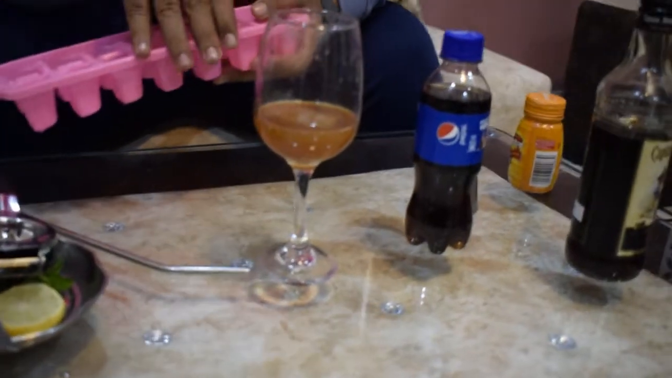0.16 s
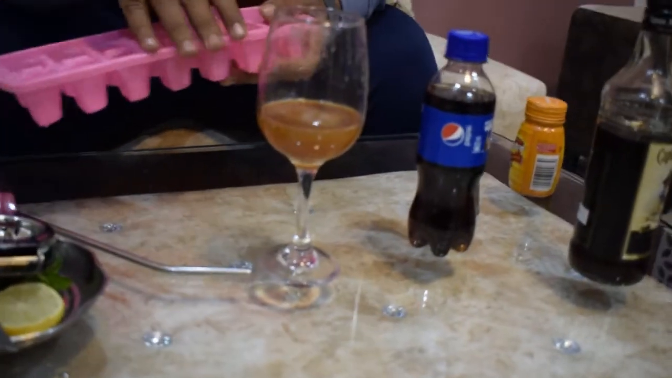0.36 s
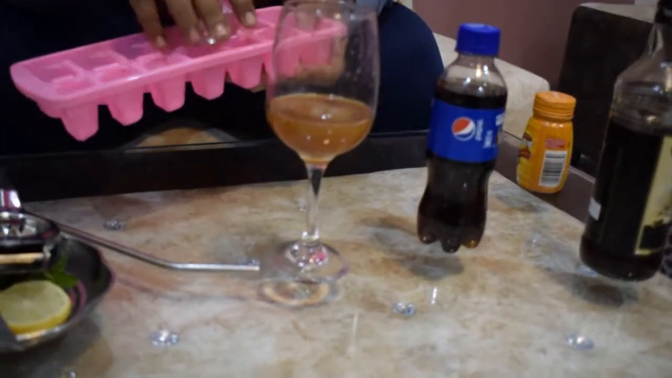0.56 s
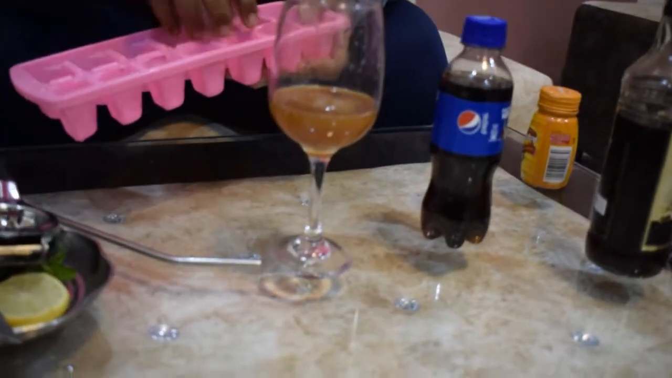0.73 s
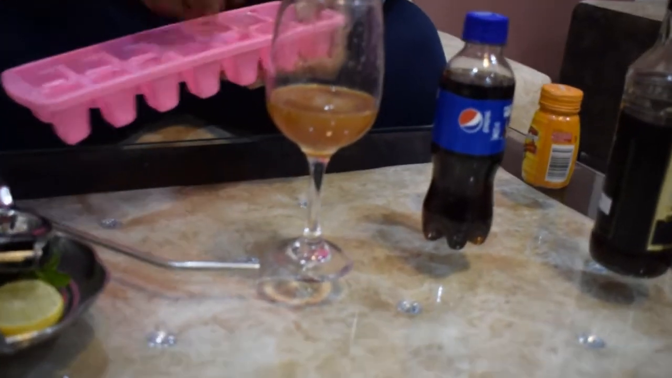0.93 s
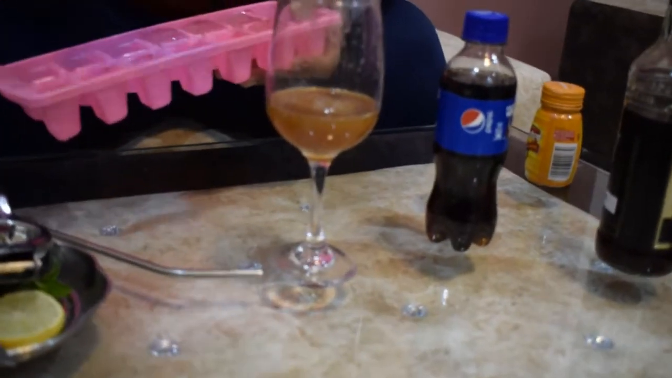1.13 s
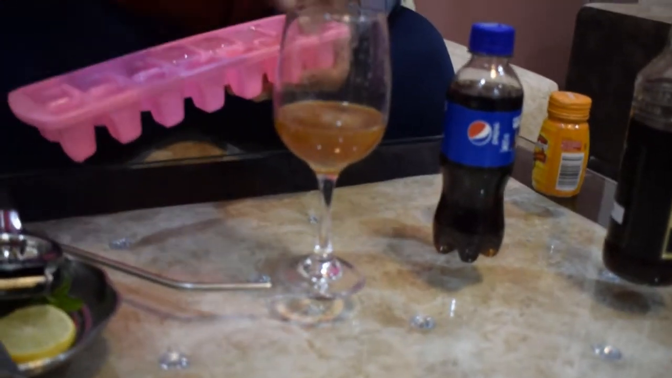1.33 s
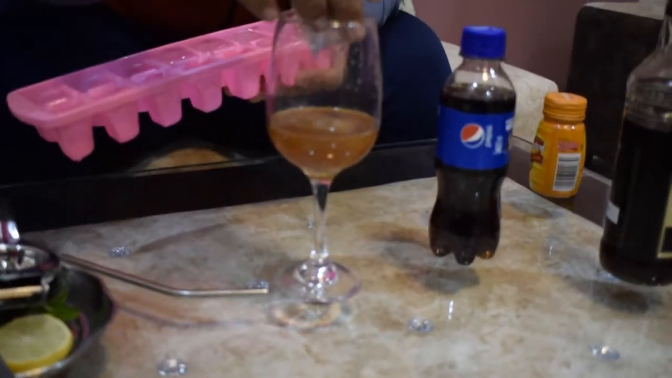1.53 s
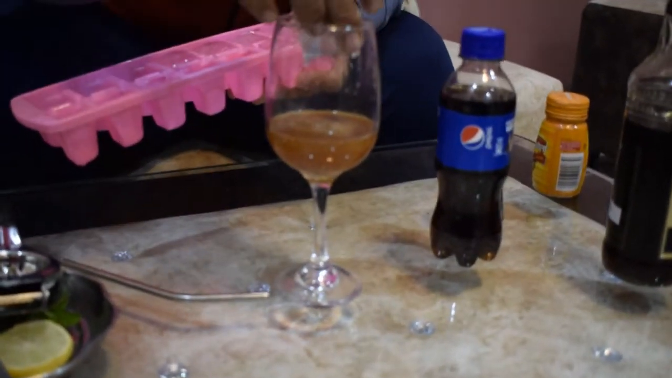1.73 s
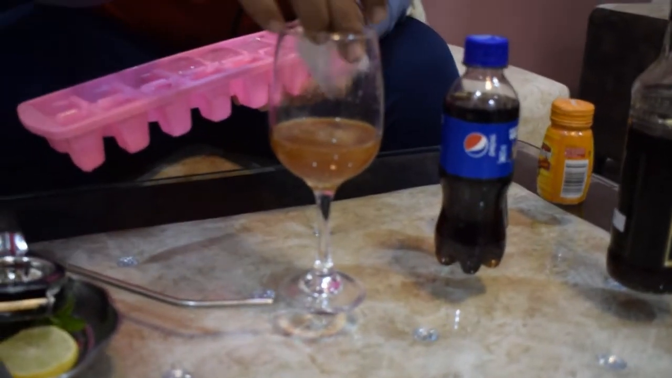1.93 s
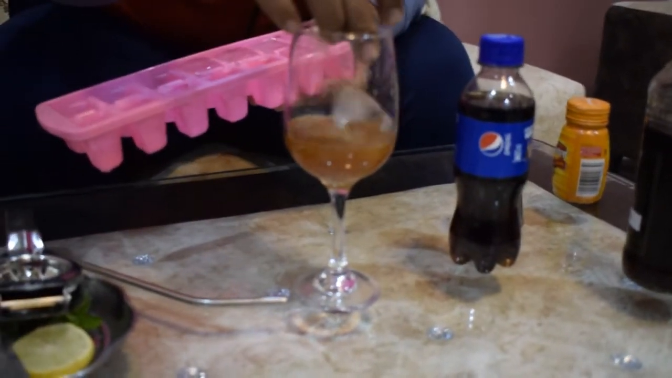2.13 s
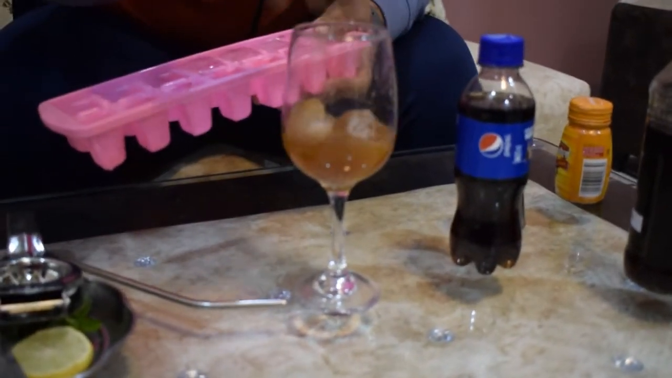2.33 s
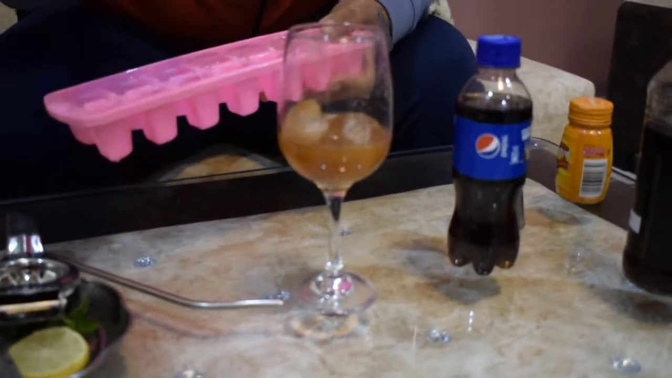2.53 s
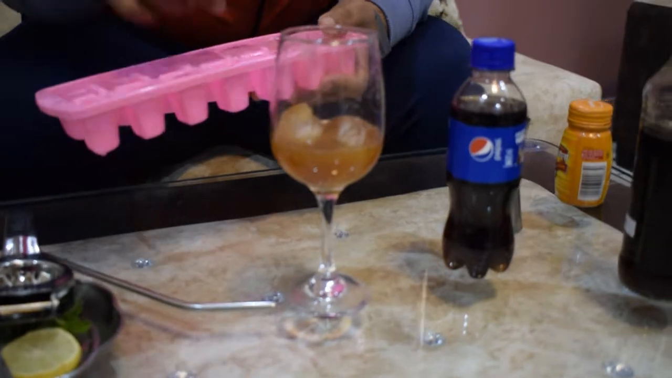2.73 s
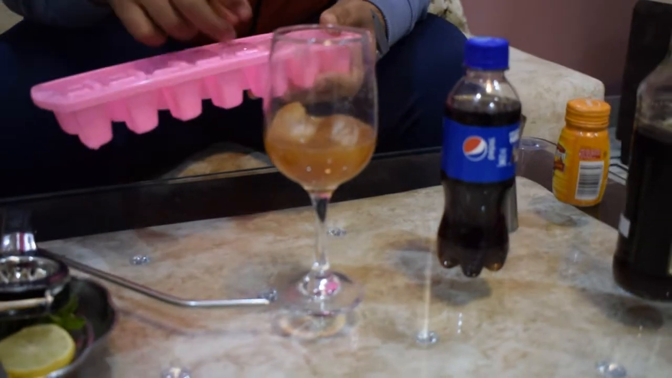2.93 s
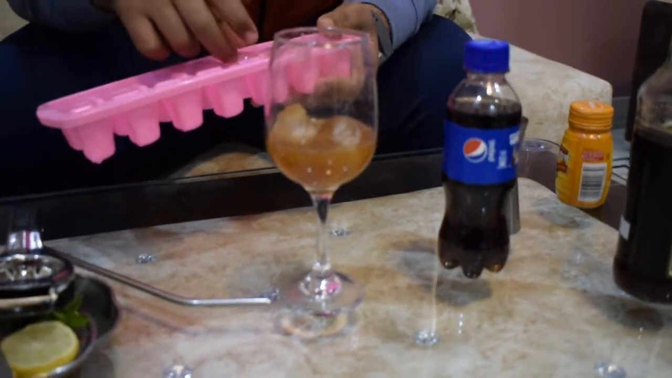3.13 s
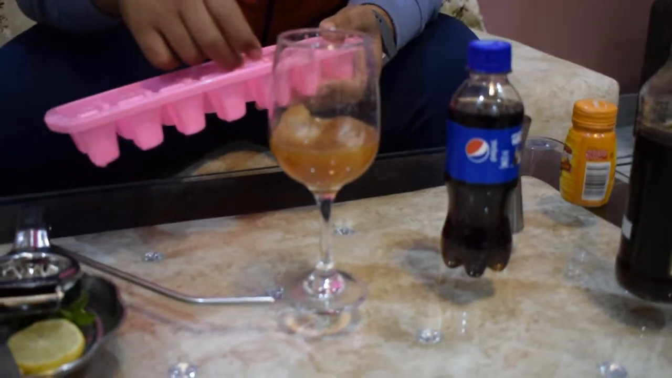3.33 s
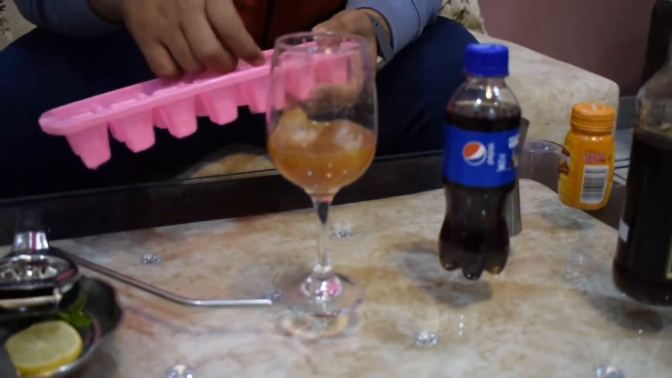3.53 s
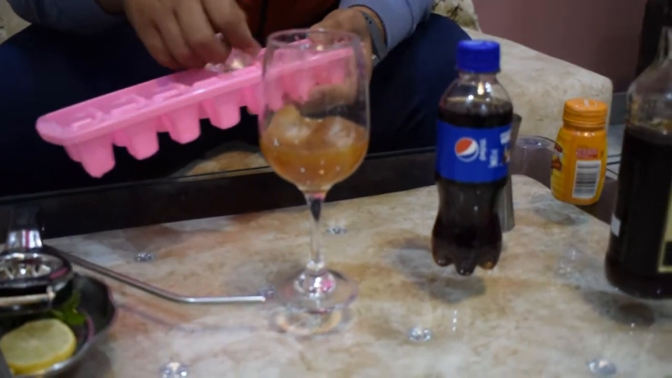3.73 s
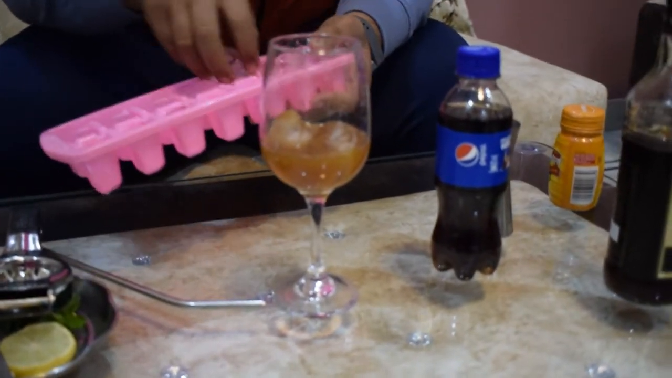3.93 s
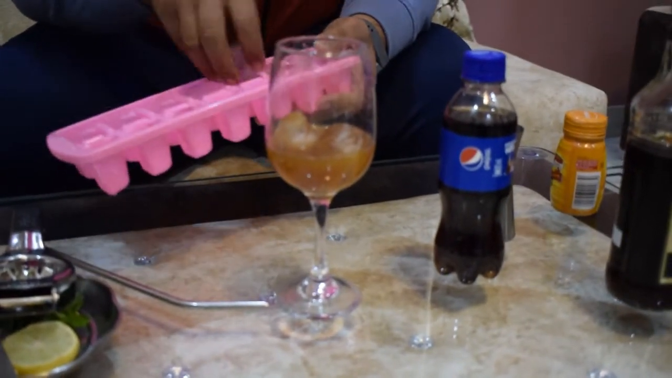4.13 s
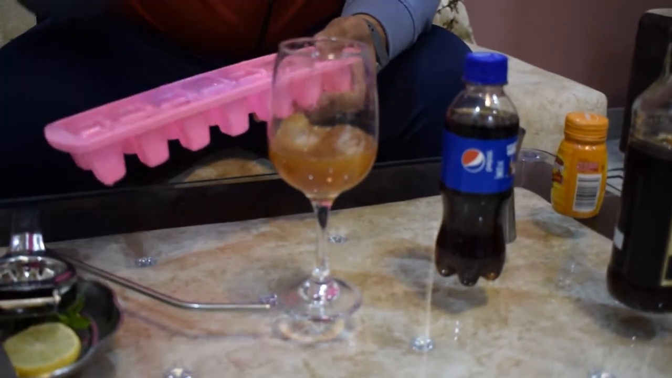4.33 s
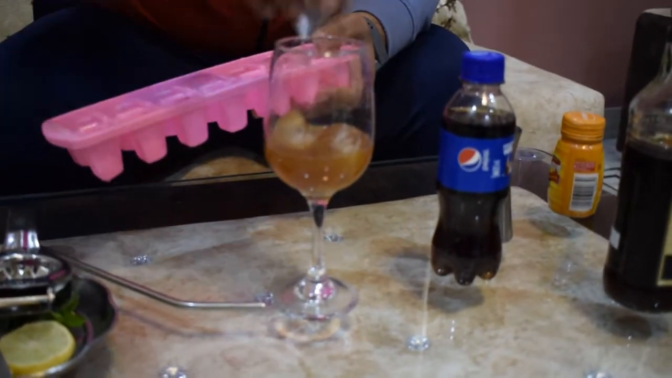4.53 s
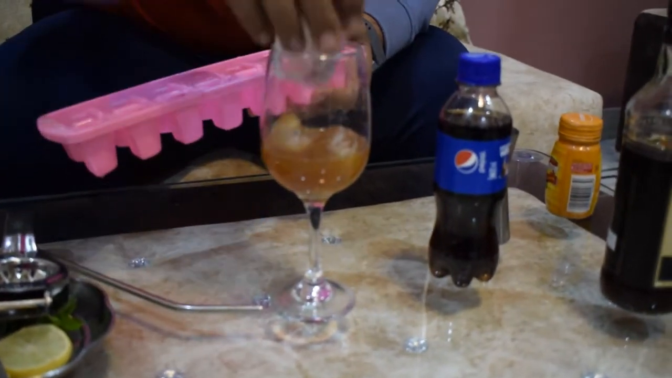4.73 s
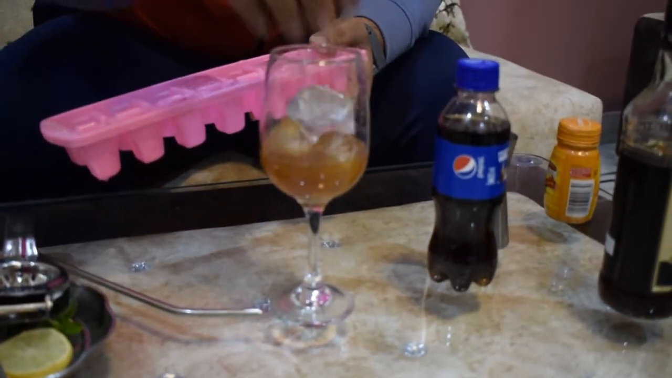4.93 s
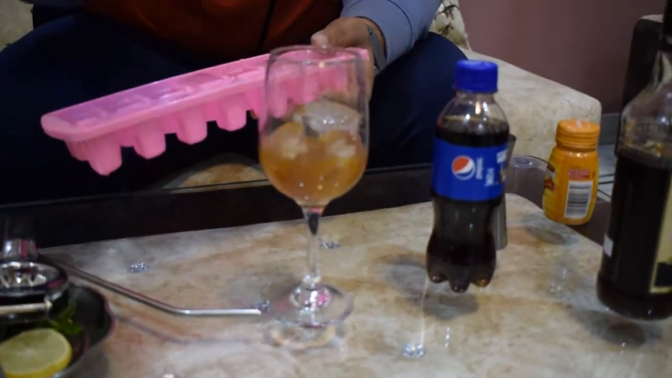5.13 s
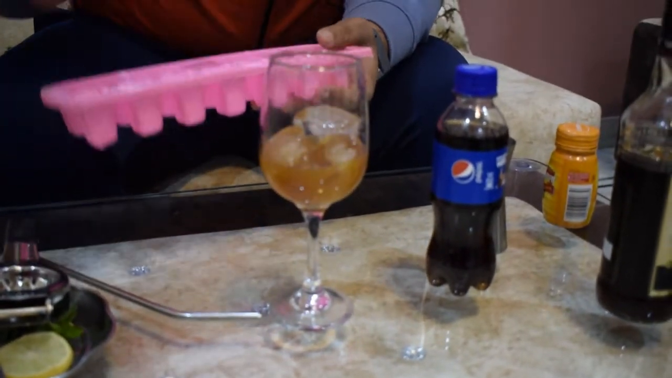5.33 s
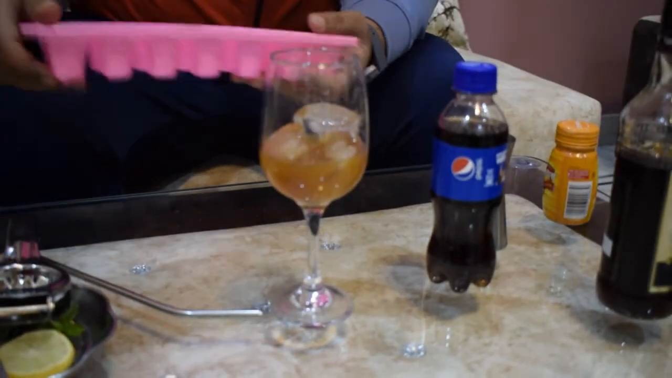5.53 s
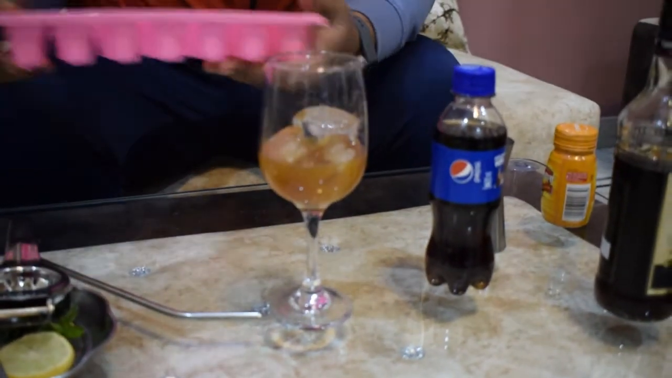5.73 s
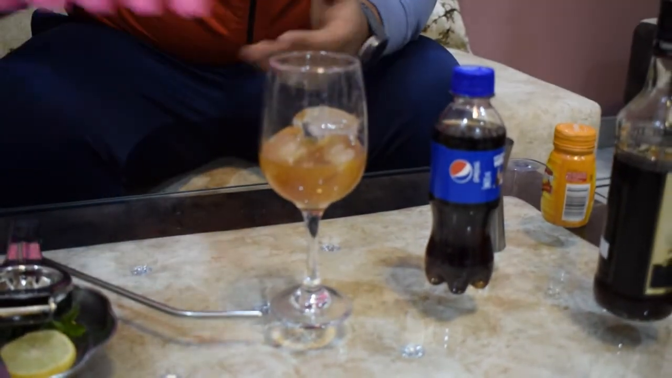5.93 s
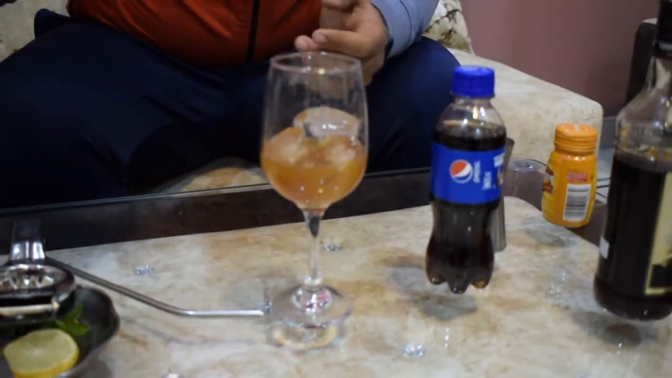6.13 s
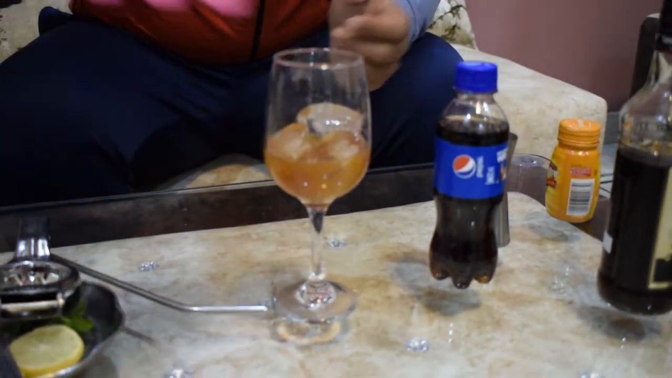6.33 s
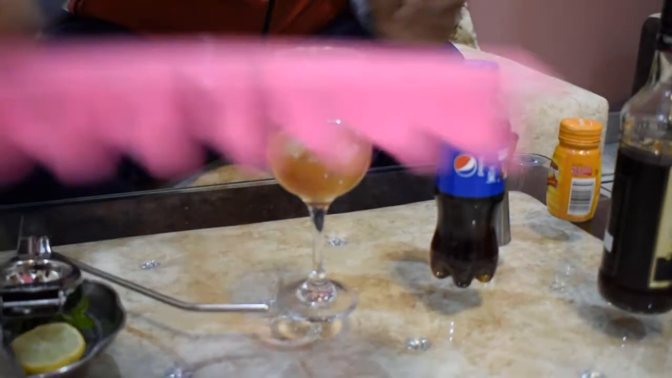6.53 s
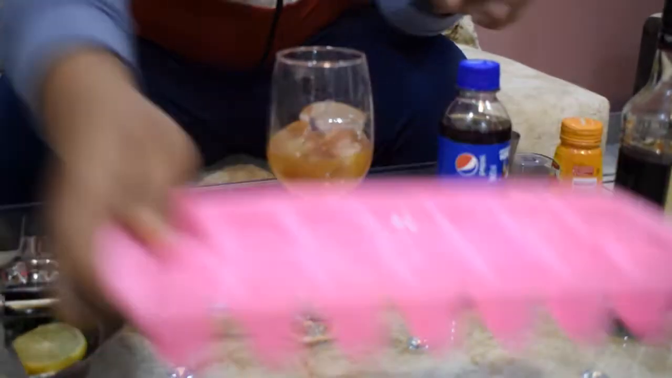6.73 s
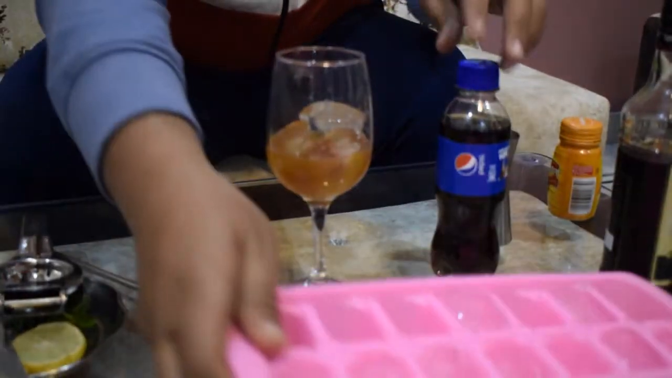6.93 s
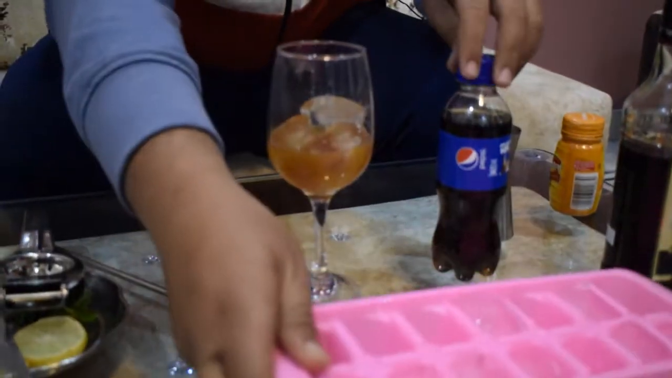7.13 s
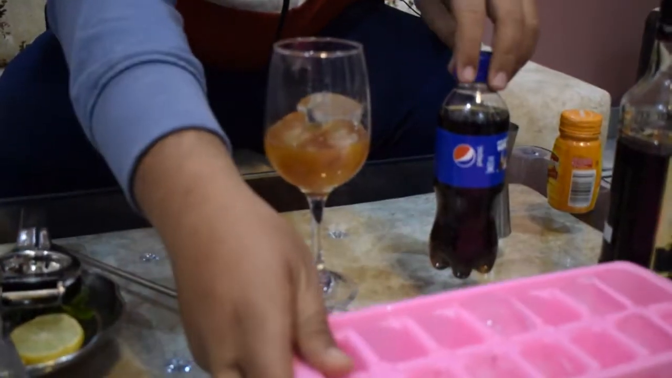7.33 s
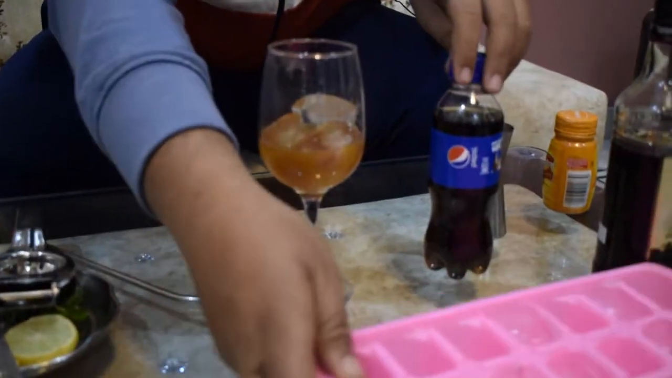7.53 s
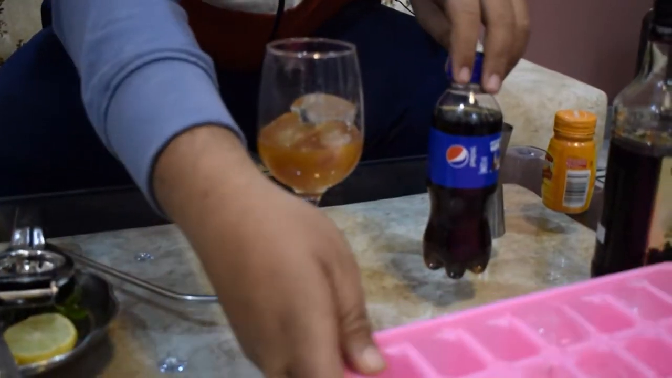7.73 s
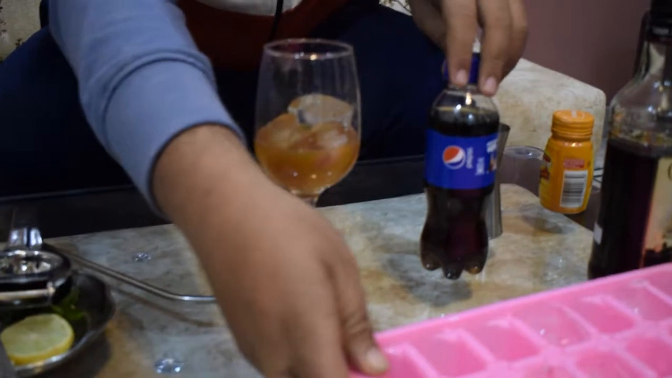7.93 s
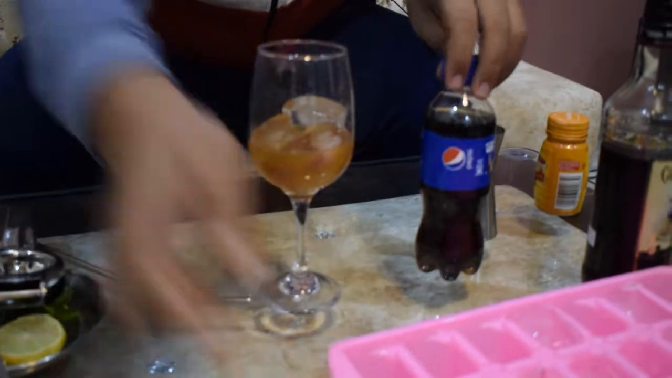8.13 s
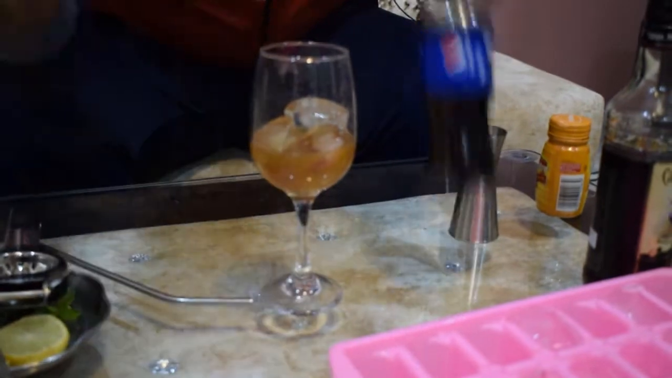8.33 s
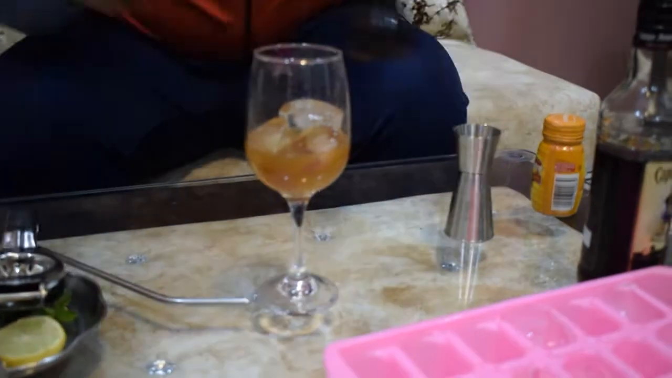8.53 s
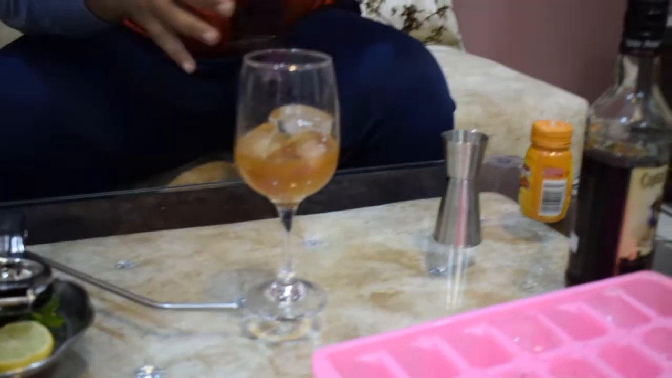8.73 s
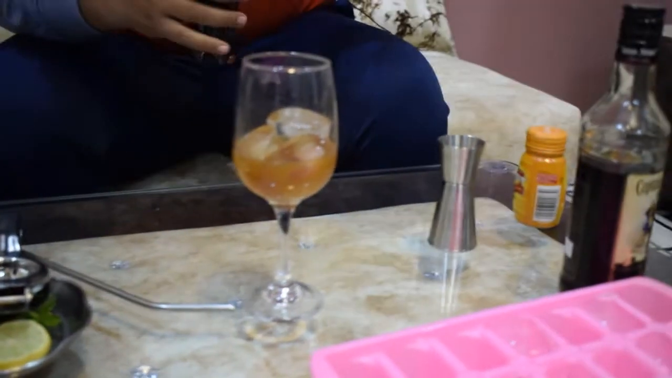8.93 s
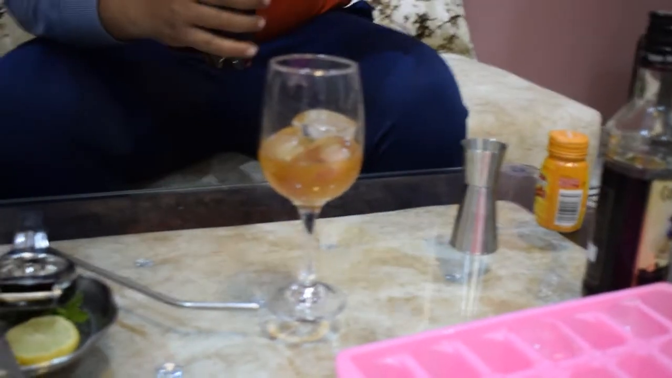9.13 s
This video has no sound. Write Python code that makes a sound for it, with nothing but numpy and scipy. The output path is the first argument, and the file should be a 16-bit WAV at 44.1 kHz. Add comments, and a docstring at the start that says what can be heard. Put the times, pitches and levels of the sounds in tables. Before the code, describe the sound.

Hollow plastic snaps and scrapes, ice striking a stemmed glass and plunging into drink twice, then soft tray knocks on a table.

```python
"""In a small hard-walled room, ice is prised from a plastic tray and dropped into a stemmed glass with a little drink.
Stick-slip noise rings the hollow cells; each landing drives the resonances of the standing glass, the modes of
its bowl and a burst of bubbles. The tray is then set down with a few knocks that excite table and cells.
Sleeves rustle, small rubs pass, and a motor whirs faintly over steady air noise; all is in mono, from close by."""
import sys
import numpy as np
from scipy import signal
from scipy.fft import rfft, irfft
from scipy.io import wavfile

SR = 44100
rng = np.random.default_rng(int(sys.argv[2]) if len(sys.argv) > 2 else 0)


def pcm_store(signal):
    """Save signal as 16-bit PCM."""
    levels = np.round(np.clip(np.atleast_2d(signal), -1, 1) * 32767)
    wavfile.write(sys.argv[1], SR, levels.astype(np.int16).T)


N = 404384


def from_db(db):
    """Level law: decibels to amplitude gain."""
    return 10 ** (np.asarray(db) / 20)


def unit_energy(x):
    """Energy normalisation: the squares sum to one."""
    return x / np.sqrt(np.sum(x ** 2) + 1e-20)


def at_hz(points, hz):
    """Interpolation on a logarithmic frequency axis."""
    knots, values = np.transpose(points)
    return np.interp(np.log(np.maximum(hz, 1)), np.log(knots), values)


def add(track, start_s, sound):
    """Superposition: a sound is summed into a track from its start time."""
    start = max(round(start_s * SR), 0)
    track[start:start + len(sound)] += sound[:N - start]


def cut(x, hz, kind, order=2):
    """Butterworth filtering: a maximally flat pass band."""
    sections = signal.butter(order, hz, kind, fs=SR, output="sos")
    return signal.sosfilt(sections, x + 1e-18)


def resonate(x, modes):
    """Modal superposition: parallel damped resonators (pitch_hz, width_hz, peak level_db)."""
    out = 0
    for hz, width, db in modes:
        radius = np.exp(-np.pi * width / SR)
        poles = [1, -2 * radius * np.cos(2 * np.pi * hz / SR), radius * radius]
        mode = (1 - radius * radius) / 2 * signal.lfilter([1, 0, -1], poles, x + 1e-18)
        out = out + from_db(db) * mode
    return out


def noise(spectrum):
    """Spectral shaping: steady random noise of a given colour, with rms 1."""
    colour = from_db(at_hz(spectrum, np.fft.rfftfreq(N, 1 / SR)))
    shaped = irfft(rfft(rng.standard_normal(N)) * colour, N)
    return unit_energy(shaped) * np.sqrt(N)


def contact(crush_s, crush_share, click=1, size=2048):
    """Contact force: an impulse plus a crunch that swells and dies as the surfaces settle."""
    age = np.arange(size) / SR / crush_s
    crunch = rng.standard_normal(size) * np.sqrt(age) * np.exp(-age)
    force = crush_share * unit_energy(crunch)
    force[0] += click
    return unit_energy(force)


def stick_slip(length_s, per_s, spread_db, snap_s=0.0024, size=6000):
    """Stick-slip friction: a swell of uneven tiny slips, which tends to one snap when very short."""
    phase = np.minimum(np.arange(size) / SR / length_s, 1)
    slipping = rng.random(size) < per_s / SR
    strength = rng.choice([-1, 1], size) * from_db(spread_db * rng.standard_normal(size))
    swell = np.sqrt(phase * (1 - phase))
    snap = np.exp(-(length_s / snap_s) ** 2 / 2)
    force = (1 - snap) * unit_energy(slipping * strength * swell)
    force[0] += snap
    return unit_energy(force)


def blows(rows, modes, thud_hz, crack_hz, crush_s, crush_share, chip_s, lowest_hz):
    """Forced vibration: the heavy, firm and sharp parts of each blow drive one resonant body."""
    thud, knock, crack = np.zeros((3, N))
    for start_s, thud_db, knock_db, crack_db, bright_hz, _ in rows:
        # soft or wet contacts have a lower brightness
        chips = cut(contact(chip_s, 0.71, click=0.66), min(bright_hz, SR / 2.2), "low", order=3)
        add(thud, start_s, from_db([thud_db]))  # a single-sample impulse
        add(knock, start_s, from_db(knock_db) * contact(crush_s, crush_share))
        add(crack, start_s, from_db(crack_db) * chips)
    heavy = cut(thud, thud_hz, "low")
    firm = cut(knock, [thud_hz, crack_hz], "band")
    sharp = cut(crack, crack_hz, "high")
    return cut(resonate(firm - heavy + sharp, modes), lowest_hz, "high")


# a cube breaks free of its cell: start_s, length_s, ring_db (hollow cell), pitch_hz (cell), crackle_db
CELL_SNAPS = [(.063, 0.0051, -3.5, 725, -11.5), (.173, 0.0056, 0.5, 1150, -7.5),
              (.271, 0.0052, 6, 990, -15), (.304, 0.0067, 16.5, 1320, 3), (0.32, 0.0042, 10.5, 990, -10),
              (0.394, 0.0037, 8.5, 1050, -4), (0.5956, 0.0023, 22, 985, 1), (.742, 0.0033, 16.5, 740, -4.5),
              (3.258, 0.0015, -2, 895, -19.5), (3.384, 0.0048, -7.5, 810, -21),
              (3.474, 0.0055, -3, 1100, -2), (3.519, 0.0059, 12.5, 1005, 1),
              (3.8233, 0.0025, 23.5, 1340, -2), (3.841, 0.0054, 11, 695, -29),
              (3.874, 0.0038, 12, 619, -27), (3.979, 0.0065, 12, 1170, -9.5),
              (4.047, 0.0058, 4.5, 1228, -18), (4.097, 0.0038, -0.5, 1230, -17),
              (4.173, 0.0097, 13.5, 1370, -3.5), (5.739, 0.0047, -7, 930, -9)]
# a cube drags along the cell wall: start_s, length_s, ring_db (hollow cell), pitch_hz (cell at first), crackle_db
CELL_SCRAPES = [(.281, .1, 8, 960, -10), (.556, 0.01, 16.5, 1160, 7), (.597, .035, 5.5, 1100, -24),
                (.723, 0.02, 8, 940, -13.5), (0.791, 0.043, 6.5, 685, -19), (.857, 0.015, -0.5, 900, -9),
                (3.46, 0.094, 1.5, 860, -8), (3.608, 0.064, 8, 1240, -4.5), (3.666, 0.096, 5, 1340, -7),
                (3.756, 0.025, 15.5, 1398, -3.5), (3.842, 0.085, 9.5, 1320, -5.5),
                (4.019, 0.02, 2.5, 1376, -11.5), (4.147, 0.022, 6.5, 1390, -9.5),
                (5.456, 0.018, -12.5, 1290, -17), (5.555, 0.04, 3, 1580, -17), (5.72, .009, -11, 1316, -15),
                (8.868, .024, -20, 1490, -16.5)]
CREEP_S, CREEP_DB = 0.012, -18.5  # just before a cube gives way; level relative to the snap
SETTLE_S, SETTLE_DB = 0.022, -19.5  # just after; level relative to the snap
JERK_S, JERK_OVERLAP, JERK_SPREAD_DB = 0.03, 0.6, 1.9  # approximate spacing, overlap in steps, unevenness
RISE_OCTAVES_PER_S = 1.1  # the cell pitch climbs from jerk to jerk


def slips():
    """Frictional instability: a snap creeps, gives and settles; a drag advances in overlapping jerks."""
    rows = []
    for s, snap_s, ring_db, hz, crackle_db in CELL_SNAPS:
        stages = [(s, snap_s, 0), (s - CREEP_S, CREEP_S, CREEP_DB), (s + snap_s, SETTLE_S, SETTLE_DB)]
        for start_s, length_s, db in stages:
            rows.append((start_s, length_s, ring_db + db, hz, crackle_db + db))
    for s, drag_s, ring_db, hz, crackle_db in CELL_SCRAPES:
        count = max(round(drag_s / JERK_S), 1)
        step_s = drag_s / (count + JERK_OVERLAP)
        jerk_s = step_s * (1 + JERK_OVERLAP)
        for k, db in enumerate(rng.normal(0, JERK_SPREAD_DB, size=count)):
            pitch_hz = hz * 2 ** (RISE_OCTAVES_PER_S * k * step_s)
            rows.append((s + k * step_s, jerk_s, ring_db + db, pitch_hz, crackle_db + db))
    return rows


# resonances of the plastic that ice makes crackle: pitch_hz, width_hz, level_db
PLASTIC_MODES = [(2090, 450, -1.5), (3580, 710, -2), (4180, 630, -2), (5300, 850, -17.5),
                 (6640, 1430, -2.5), (7540, 210, -3), (10960, 1000, -12), (12500, 1500, -8.5),
                 (14700, 510, -34)]


def ice_in_tray(cell_width_hz=220, wall_hz=760, wall_db=-13, lowest_hz=450, highest_hz=2100):
    """Cavity and wall resonance: slips ring the hollow cell, its pitch set by each slip, and crackle in the plastic."""
    hollow, crackle = np.zeros((2, N))
    for start_s, length_s, ring_db, cell_hz, crackle_db in slips():
        cell = [(cell_hz, cell_width_hz, 0), (wall_hz, 350, wall_db), (1550, 300, -18)]
        ring = resonate(stick_slip(length_s, per_s=1400, spread_db=4), cell)
        add(hollow, start_s, from_db(ring_db) * ring)
        grains = stick_slip(length_s, per_s=3200, spread_db=3.5, snap_s=0.0011)
        add(crackle, start_s, from_db(crackle_db) * grains)
    hollow = cut(cut(hollow, lowest_hz, "high"), highest_hz, "low", order=4)
    return hollow, cut(resonate(crackle, PLASTIC_MODES), 650, "high")


# thin ice splintering: start_s, level_db
SPLINTER_TICKS = [(0.049, -8), (.55, 0), (.563, 1), (.596, 0), (0.838, -12), (3.0161, -5.5), (3.068, -8),
                  (5.696, -8.5)]
# resonances of a splinter: pitch_hz, width_hz, level_db
SPLINTER_MODES = [(7200, 2300, -5.5), (13500, 2800, -2)]
FIDGET_FROM_S, FIDGET_TO_S, FIDGET_DB = 3.14, 3.44, -22.5  # fingers feel for the next cube


def splinters(length_s=0.0027, count=7):
    """Brittle fracture: tiny breaks give dry, glassy ticks; faint ones come at random under the fingers."""
    out = np.zeros(N)
    faint = [(s, FIDGET_DB) for s in rng.uniform(FIDGET_FROM_S, FIDGET_TO_S, count)]
    for start_s, db in SPLINTER_TICKS + faint:
        fracture = stick_slip(length_s, per_s=25000, spread_db=7, snap_s=0.0012)
        add(out, start_s, from_db(db) * resonate(fracture, SPLINTER_MODES))
    return cut(out, 1900, "high")


# ice strikes the glass: start_s, level_db, bright_hz (contact), ring_db (bowl)
GLASS_STRIKES = [(2.0236, 23.5, 4830, -42), (2.0273, 19.5, 6200, -39), (2.047, 14.5, 7950, -42),
                 (2.089, 12, 15000, -39), (2.164, 5, 14000, -60), (2.305, -12, 2000, -39),
                 (4.7276, 8.5, 6800, -41), (4.863, -5, 9000, -38), (4.877, 24, 5800, -28),
                 (4.954, 18.5, 16000, -17), (5.0015, -1, 6000, -37), (5.010, 13.5, 6900, -42),
                 (5.127, 0, 10900, -47.5)]
# ice plunges into the drink: start_s, level_db, ring_db (bowl)
DRINK_PLUNGES = [(2.125, 8, -52), (2.148, 14, -55), (2.189, 2.5, -32.5), (4.864, 17.5, -36)]
STRIKE_THUD_DB, STRIKE_CRACK_DB = 0, -6  # relative to the firm knock
# the drink cushions the blow: levels relative to the thud
WET_KNOCK_DB, WET_CRACK_DB, WET_BRIGHT_HZ = -16, -20, 1480


def landings():
    """Impact hardness: rows in time order of start_s, thud_db, knock_db, crack_db, bright_hz, ring_db."""
    rows = []
    for s, db, hz, ring_db in GLASS_STRIKES:
        rows.append((s, db + STRIKE_THUD_DB, db, db + STRIKE_CRACK_DB, hz, ring_db))
    for s, db, ring_db in DRINK_PLUNGES:
        rows.append((s, db, db + WET_KNOCK_DB, db + WET_CRACK_DB, WET_BRIGHT_HZ, ring_db))
    return sorted(rows)


# glass with drink standing on the table: pitch_hz, width_hz, level_db
STANDING_GLASS_MODES = [(152.7, 10, -3.5), (190, 74, -5), (283, 120, -8.5), (402, 87, 0), (458, 42, 0.5),
                        (658, 160, -5.5), (848, 120, -8), (1007, 162, -1.5), (1130, 19, 3.5),
                        (1230, 210, -8), (1500, 38, -6), (1613, 94, -9.5), (1986, 240, -4.5),
                        (2470, 93, -0.5), (2850, 120, -3.5), (3570, 230, -4.5), (4070, 300, -4),
                        (7040, 3100, -10), (14100, 5200, -6)]


def struck_glass():
    """Coupled vibration: each blow excites the glass together with the table it reaches through the stem."""
    return blows(landings(), STANDING_GLASS_MODES, thud_hz=610, crack_hz=2780, crush_s=0.0042,
                 crush_share=1.0, chip_s=0.0023, lowest_hz=119)


# bending modes of the bowl: pitch_hz, level_db, t60_s, choke_db (change when ice next lands)
BOWL_MODES = [(1138, -14, .75, -5), (3047, -1, .19, -5), (3045, -18.5, .7, -2), (3679, -13, .2, -3),
              (5685, -2, .16, -13), (7900, -9, .03, -6), (8549, -14, .27, -2), (8620, -3, .035, -6),
              (11400, -12, .03, -6), (15120, -10, .025, -6)]


def bowl_ring():
    """Free decay of bending modes: each landing sets the bowl ringing and the next one partly chokes it."""
    t, out = np.arange(SR) / SR, np.zeros(N)
    drops = landings()
    next_touch = [row[0] for row in drops[1:]] + [np.inf]
    for (start_s, *_, bright_hz, ring_db), touch_s in zip(drops, next_touch):
        choked = np.clip((start_s + t - touch_s) / 0.002, 0, 1)
        for hz, db, t60_s, choke_db in BOWL_MODES:
            decay = from_db(-60 * t / t60_s + choke_db * choked)
            # a dull contact barely reaches the upper modes
            height = from_db(ring_db + db) / np.hypot(1, (hz / bright_hz) ** 2)
            add(out, start_s, height * decay * np.sin(2 * np.pi * hz * t))
    return out


def splash(level_db=-45.5, spread_s=0.045, low_hz=600, high_hz=3000, cycles=14, rise=0.24, count=14):
    """Bubble resonance: landings push air under the drink, more loudly when heavy; bubbles rise in pitch."""
    t, out = np.arange(SR // 20) / SR, np.zeros(N)
    for start_s, thud_db, *_ in landings():
        for delay, pitch, size in rng.random((count, 3)):
            hz = low_hz * (high_hz / low_hz) ** pitch
            age = t * hz / cycles
            bubble = np.exp(-np.pi * age) * np.sin(2 * np.pi * hz * t * (1 + rise * age))
            add(out, start_s + spread_s * delay, size * from_db(level_db + thud_db) * bubble)
    return out


# the tray meets the table: start_s, thud_db, knock_db, bright_hz (contact)
TRAY_TOUCHES = [(1.461, -6, -26, 4000), (1.523, -8.5, -36, 4000), (6.722, -3.5, -20.5, 12000),
                (6.797, -8, -15.5, 9000), (7.0715, 12, -4.5, 9400), (7.264, 0, -3.5, 5970),
                (7.560, -3, -5.5, 14000), (7.567, 5, -1.5, 2980), (7.812, -2, -4.5, 3370)]
# tray on the table: pitch_hz, width_hz, level_db
TABLE_MODES = [(156, 21, 1), (217, 113, -0.5), (353, 64, 5), (454, 51, -5), (617, 58, 3.5), (930, 140, -2),
               (1850, 520, -2.5), (2940, 430, -6.5), (3960, 470, -2), (12800, 3600, -12)]
# hollow cells of the tray: pitch_hz, width_hz, level_db
CELL_MODES = [(1135, 220, 2.5), (1354, 200, -2)]
TOUCH_CRACK_DB, TOUCH_HOLLOW_DB = -2, 3  # sharp part and ring of the cells, relative to the knock


def tray_set_down(rattle_s=0.0063):
    """Impact excitation: the feet knock on the table top and the half-empty cells answer with a hollow rattle."""
    rattle, knocks = np.zeros(N), []
    for start_s, thud_db, knock_db, bright_hz in TRAY_TOUCHES:
        hollow_db = knock_db + TOUCH_HOLLOW_DB
        knocks.append((start_s, thud_db, knock_db, knock_db + TOUCH_CRACK_DB, bright_hz, hollow_db))
        add(rattle, start_s, from_db(hollow_db) * contact(rattle_s, 0.75, click=0.44))
    feet = blows(knocks, TABLE_MODES, thud_hz=750, crack_hz=2220, crush_s=0.006,
                 crush_share=1.0, chip_s=0.00055, lowest_hz=101)
    return feet + resonate(rattle, CELL_MODES)


# an arm sweeps past: start_s, length_s, level_db
ARM_SWEEPS = [(5.84, 0.23, -51), (6.603, 0.43, -48), (7.28, .33, -54), (8.096, 0.64, -45.5),
              (8.716, 0.56, -53)]
# colour of the cloth noise: pitch_hz, level_db (per Hz)
CLOTH_SPECTRUM = [(30, -3), (70, -3.5), (150, -10), (290, 3), (500, -8), (900, 4), (2000, -8.5),
                  (5000, -19.5), (10000, -25), (16000, -31)]
SWISH_SHAPE = 0.78  # higher is more peaked


def sleeves(split_hz=900, low_db=2.5, high_db=-1.0):
    """Friction noise: cloth swishes under the speed of each arm sweep, which grows and falls."""
    speed, cloth = np.zeros(N), noise(CLOTH_SPECTRUM)
    for start_s, length_s, db in ARM_SWEEPS:
        sweep = np.hanning(int(length_s * SR)) ** (SWISH_SHAPE / 2)
        add(speed, start_s, from_db(db) * sweep)
    low = from_db(low_db) * cut(cloth, split_hz, "low")
    high = from_db(high_db) * cut(cloth, split_hz, "high")
    return speed * (low + high)


# soft hisses, squeaks and low rumbles: start_s, length_s, pitch_hz (centre), width_hz (first resonator), level_db
SOFT_RUBS = [(0, 0.21, 92, 22, -53.5), (2.416, 0.22, 3780, 2000, -55.5), (2.427, 0.15, 10500, 8100, -54.5),
             (3.27, 0.16, 2850, 50, -68), (4.427, 0.34, 94, 8.8, -61), (5.526, 0.0043, 6400, 1100, -44.5),
             (5.889, 0.094, 7400, 3900, -56), (6.709, 0.0068, 3800, 1900, -36.5),
             (6.894, 0.004, 7100, 620, -42.5), (7.382, 0.11, 3570, 360, -60.5),
             (8.917, 0.0043, 5500, 2000, -43), (8.949, 0.37, 237, 84, -51)]


def rubs():
    """Band-limited noise: two resonators in series colour each smooth swell, narrow or broad."""
    out = np.zeros(N)
    for start_s, length_s, hz, width, db in SOFT_RUBS:
        swell = np.sqrt(np.hanning(int(length_s * SR)))
        narrowed = resonate(rng.standard_normal(SR), [(hz, width, 0)])
        # the end of the noise, where the resonators have settled
        hiss = resonate(narrowed, [(hz, 2 * width, 0)])[-len(swell):]
        add(out, start_s, from_db(db) * swell * hiss / hiss.std())
    return out


# whirs of a small motor: start_s, length_s, level_db
MOTOR_WHIRS = [(1.39, 0.12, -63), (6.585, 0.11, -48), (6.777, 0.06, -47.5)]
# resonances of the motor: pitch_hz, width_hz, level_db
MOTOR_MODES = [(2450, 1600, 12), (5080, 360, 19.5), (11070, 180, 14.5), (12100, 300, -3)]
# path of a thin whine that rises and falls: time_s, pitch_hz, level_db (fundamental)
WHINE_PATH = [(8.2, 6000, -94), (8.32, 7900, -73), (8.419, 9300, -62), (8.51, 11000, -73),
              (8.58, 9700, -64), (8.66, 7400, -79)]
WHINE_OVERTONE_DB = -3  # second harmonic, relative to the fundamental


def motor():
    """Resonant noise and frequency modulation: short whirs, and one thin gliding whine."""
    drive = np.zeros(N)
    for start_s, length_s, db in MOTOR_WHIRS:
        add(drive, start_s, from_db(db) * np.sqrt(np.hanning(int(length_s * SR))))
    whir = unit_energy(resonate(rng.standard_normal(N), MOTOR_MODES)) * np.sqrt(N)
    t = np.arange(N) / SR
    time_s, hz, db = np.transpose(WHINE_PATH)
    phase = 2 * np.pi * np.cumsum(np.interp(t, time_s, hz)) / SR
    whine = np.sin(phase) + from_db(WHINE_OVERTONE_DB) * np.sin(2 * phase)
    loudness = np.interp(t, time_s, from_db(db), left=0, right=0)
    return drive * whir + whine * loudness


# colour of the steady air noise: pitch_hz, level_db (per Hz)
AIR_SPECTRUM = [(18, -26), (30, 8), (59, -2.5), (161, -1.5), (204, -3), (355, -1), (666, -10), (937, -7),
                (1250, -13.5), (5040, -21.5), (8300, -22), (16000, -24.5)]


def air(level_db=-55.5):
    """Stationary noise: a steady coloured bed at a fixed rms level."""
    return from_db(level_db) * noise(AIR_SPECTRUM)


# decay of the room: pitch_hz, t60_s
REVERB_T60 = [(120, 0.62), (500, 0.44), (1200, 0.64), (2500, 0.35), (5000, 0.41), (14000, 0.13)]
# colour of the reverberation: pitch_hz, level_db
REVERB_COLOUR = [(120, -1.5), (500, -5), (1200, -0.5), (2500, 0), (5000, -6.5), (14000, -6)]


def reverberation(x, gap_s=0.0025, early_db=2.5, early_s=0.012):
    """Diffuse-field decay: dense reflections, strongest at first, with the treble dying soonest."""
    t = np.arange(SR) / SR
    hz = np.fft.rfftfreq(SR, 1 / SR)
    white = rfft(rng.standard_normal(SR))
    centres = np.geomspace(60, 16000, 12)
    early = (t > gap_s) * (1 + from_db(early_db) * np.exp(-t / early_s))
    tail = 0
    for centre, weights in zip(centres, np.eye(len(centres))):
        band = irfft(white * at_hz(np.c_[centres, weights], hz), SR)
        decay = from_db(-60 * t / at_hz(REVERB_T60, centre))
        tail = tail + band * unit_energy(decay * early) * from_db(at_hz(REVERB_COLOUR, centre))
    return signal.fftconvolve(x, tail)[:N]


# standing waves of the room: pitch_hz, width_hz, level_db
STANDING_WAVES = [(157.4, 3.5, 3), (186, 6, -10), (279, 8, 10), (443, 8.9, -1.5), (501, 18, 7),
                  (757, 13, 4), (836, 29, 3), (1013, 6.5, 2), (1255, 11, -7), (1380, 7.5, 4),
                  (1930, 5.2, -12), (2260, 4.8, 3), (2600, 8.3, -25)]


def standing_waves(x):
    """Room modes: the sound sent into the room drives its sharp low and middle resonances."""
    return resonate(x, STANDING_WAVES)


def scene(hollow_room_db=-6.5, crackle_room_db=-5.0, glass_room_db=0.0, bowl_room_db=-7.5, table_room_db=2.5):
    """Direct and reverberant fields: the table sends most to the room; tray and bowl are heard more directly."""
    hollow, crackle = ice_in_tray()
    glass = struck_glass() + splash()
    bowl, table = bowl_ring(), tray_set_down()
    sent = (from_db(hollow_room_db) * hollow + from_db(crackle_room_db) * crackle
            + from_db(glass_room_db) * glass + from_db(bowl_room_db) * bowl + from_db(table_room_db) * table)
    echo = reverberation(sent) + standing_waves(sent)
    background = sleeves() + rubs() + motor() + air()
    mono = hollow + crackle + splinters() + glass + bowl + table + echo + background
    return np.array([mono, mono])


def record(dry, top=1.3, cutoff_hz=16200):
    """Saturation and band limiting: the highest peaks are rounded, then the extreme treble is cut."""
    rounded = top * np.tanh(dry / top)
    low_pass = signal.ellip(10, 0.1, 70, cutoff_hz, fs=SR, output="sos")
    return signal.sosfilt(low_pass, rounded)


dry = scene()
out = record(dry)
pcm_store(out)
```